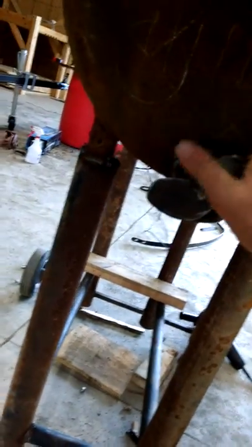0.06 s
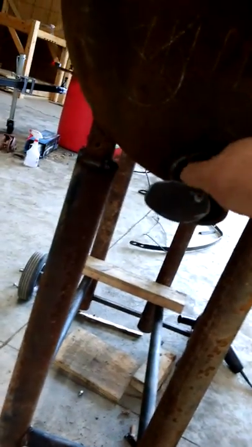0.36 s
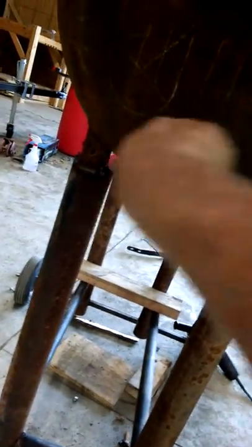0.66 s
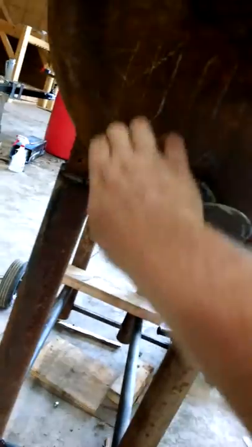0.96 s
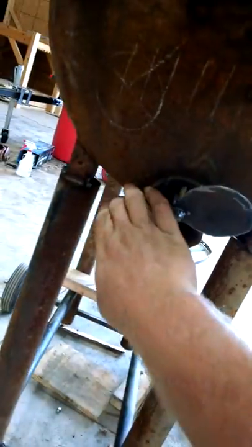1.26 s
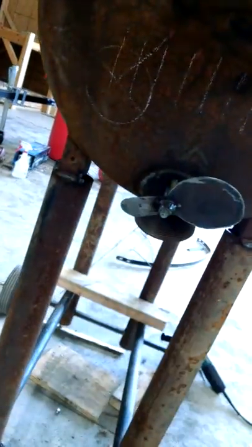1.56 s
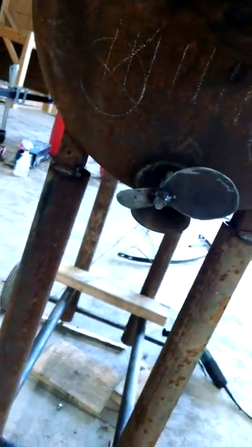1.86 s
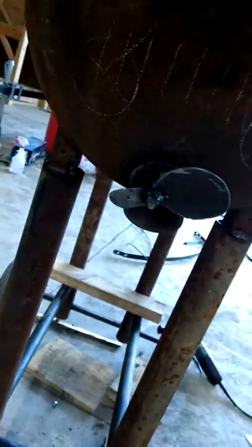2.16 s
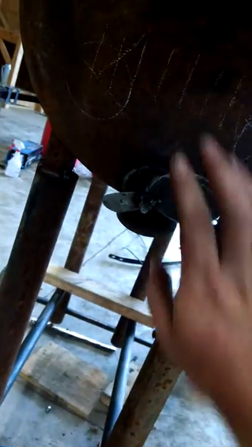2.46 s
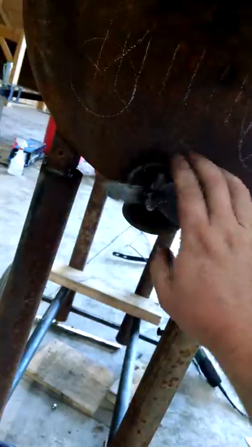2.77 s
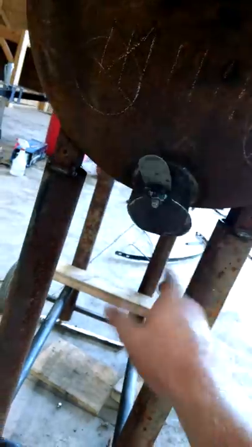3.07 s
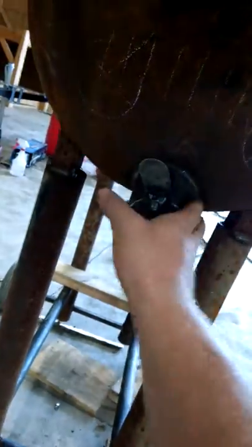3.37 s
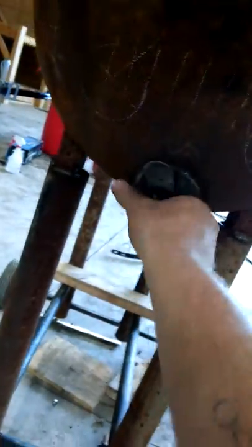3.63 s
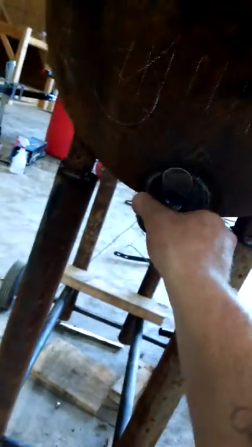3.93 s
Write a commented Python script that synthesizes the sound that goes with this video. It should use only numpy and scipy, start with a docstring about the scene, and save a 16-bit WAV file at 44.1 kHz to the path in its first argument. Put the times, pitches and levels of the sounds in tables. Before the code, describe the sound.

A steel vent flap on a big drum scrapes and rattles open, then shuts about two seconds later with one hard, briefly ringing clack. A blower hums and hisses steadily in the workshop, dipping at the clacks.

```python
"""Steel vent flap and workshop blower.

A hand works the round steel vent flap of a big drum while a blower hums and hisses steadily.
The flap scrapes and rattles open; about two seconds later one hard clack shuts it and leaves it ringing.
Automatic gain control ducks at the clacks, so the blower sinks and swells back slowly."""
import sys
import numpy as np
from scipy import signal
from scipy.fft import rfft, irfft
from scipy.io import wavfile

SR = 44100
rng = np.random.default_rng(int(sys.argv[2]) if len(sys.argv) > 2 else 0)


def store_pcm(level_fs):
    """Save levels as 16-bit WAV."""
    pcm = np.round(np.clip(level_fs, -1, 1) * 32767).astype(np.int16)
    wavfile.write(sys.argv[1], SR, np.atleast_2d(pcm).T)


N = 176400
T = np.arange(N) / SR
HZ = np.maximum(np.fft.rfftfreq(N, 1 / SR), 1)

# Coherence of the two microphone ports. Each row: frequency in Hz, left-right likeness from 0 to 1.
LIKENESS = [(60, 0.62), (250, 0.9), (550, 0.66), (900, .92), (1400, 0.98), (1700, .62), (2050, 0.52),
            (2520, 0.99), (2780, 0.97), (3280, 0.3), (3750, 0.93), (4080, 0.94), (4400, 0.38), (5000, 0.8),
            (5400, 0.72), (6000, 0.55), (14000, 0.53)]
FLAP_LIKENESS = 0.78


def flap_opens():
    """Each touch on the seat wakes a damped knock, clank and tick in the held plate; let go, it rings."""
    # Each row: start in seconds, length in seconds, knock in dB, clank in dB, tick in dB.
    touches = [ (0.552, 0.012, -38, -23.5, -22), (0.567, 0.022, -45, -20.5, -21),
               (0.588, 0.0034, -28, -18, -8), (0.591, 0.003, -12.5, -24, -26),
               (0.597, 0.002, -30, -15, -18), (0.6795, 0.0037, -24, -19.5, -28),
               (0.6868, 0.0052, -15, -16, -12.5), (0.695, 0.013, -26, -19, -19.5),
               (0.7125, 0.0034, -39, -15.5, -13), (0.7172, .002, -37, -23, -6)]
    # Held plate. Each row: frequency in Hz, relative density in dB.
    held_spectrum = [(100, -20), (240, -9), (450, -21), (1150, -14), (1500, 10), (1900, -12), (2900, -13),
                     (3600, -12), (4800, -19), (5500, -15), (6200, -12.5), (7300, -19), (8200, -4.5),
                     (8600, -23), (9100, -3), (9600, -16), (10300, -14.1), (11000, -5.5), (12000, -17),
                     (15500, -14)]
    # Free plate. Each row: frequency in Hz, relative level in dB, T60 in seconds.
    open_modes = [(232, -5, .15), (795, -13.5, .11), (1335, -16, .08), (1546, -1.5, .09), (2520, -11, .08),
                  (3676.5, -11, .4), (4430.5, 2, .31), (4753, -13, .12), (6200, -4, .04), (9155, 1.5, .045),
                  (12610, -6, .09)]
    # Knocks that ring it. Each row: start in seconds, gain in dB, contact cutoff in Hz.
    strikes = [(.591, -20, 1600), (0.686, -7, 1750), (0.7135, -28, 12000), (0.7195, -17, 14000)]
    knock_top_hz, clank_top_hz = 2240, 5600
    tail_db, tail_t60_s = -18, 0.26
    colour = from_db(over_hz(held_spectrum))
    grain = chatter(rough_db=1.5)
    bands = [(below(knock_top_hz), 0.045, 1),
             (above(knock_top_hz) * below(clank_top_hz), 0.045, grain),
             (above(clank_top_hz), 0.035, grain)]
    rattle = 0
    for k, (band, t60_s, roughness) in enumerate(bands):
        power = 0
        for start_s, length_s, *band_db in touches:
            contact = burst(start_s, length_s, t60_s)
            tail = from_db(tail_db) * burst(start_s, length_s, tail_t60_s)
            power += from_db(band_db[k]) ** 2 * (contact ** 2 + tail ** 2)
        rattle += np.sqrt(power) * noise(colour * band, FLAP_LIKENESS) * roughness
    ringing = sum(from_db(db) * ring(open_modes, start_s, top_hz) for start_s, db, top_hz in strikes)
    return rattle + ringing


def ring(modes, start_s, top_hz):
    """Struck modes die away; a soft contact hardly wakes those above top_hz."""
    tone = 0
    for hz, db, t60_s in modes:
        gain = from_db(db) / np.sqrt(1 + (hz / top_hz) ** 6)
        envelope = burst(start_s, 0, t60_s, rise_s=0.0011)
        tone += gain * envelope * np.sin(2 * np.pi * (hz * T + rng.random()))
    return at_ports(tone)


def flap_shuts():
    """A dull graze on the seat, a hard chatter, then the drum's dense ring and the flap's unsteady modes."""
    # Clack. Each row: frequency in Hz, relative density in dB.
    clack_spectrum = [(100, -24), (300, -34), (900, -36), (1650, -3), (2100, -9), (2350, -4), (2540, 0),
                      (2740, -20), (2950, -3), (3250, -3.5), (3850, -2), (4700, -3.5), (6700, -10),
                      (8200, -5), (8600, -12), (9050, -2), (9800, -16), (10700, -8), (11250, 4.5),
                      (12200, -14), (13100, -5), (13600, -23), (13950, -11), (14650, -18), (15500, -8)]
    # Shut plate. Each row: frequency in Hz, relative level in dB, T60 in seconds.
    shut_modes = [(1362, -23.5, .35), (2590, -15, .16), (2961, -15, .16), (3397, -29, .35),
                  (3636, -23, .24), (3764, -21, .33), (3794, -24, .28), (3973, -25, .28), (4006, -25, .3),
                  (4056, -26, .28), (4315, -26, .33), (4694, -25, .33), (5044, -28, .3), (5469, -27, .22),
                  (5696, -25, .25), (6309, -32, .3), (8200, -11, .05), (9050, -10, .05), (11050, -9, .07),
                  (11380, -6.5, .065), (13010, -8.5, .075)]
    shut_s, graze_s, hold_s, rise_s = 2.9705, 0.002, 0.0099, 0.008
    graze_db, clack_db, drum_db, modes_db = -19, -2.5, -14, -0.5
    contact_t60_s, drum_t60_s = 0.065, 0.35
    colour = from_db(over_hz(clack_spectrum))
    likeness = over_hz(LIKENESS)
    graze = from_db(graze_db) * burst(shut_s - graze_s, graze_s, contact_t60_s)
    graze = graze * noise(colour * below(hz=2900), FLAP_LIKENESS)
    clack = from_db(clack_db) * burst(shut_s, hold_s, contact_t60_s, rise_s)
    clack = clack * chatter(rough_db=3.0) * noise(colour, likeness)
    drum = from_db(drum_db) * burst(shut_s, 0, drum_t60_s, rise_s)
    drum = drum * noise(colour * below(hz=6200), likeness)
    modes = 0
    for hz, db, t60_s in shut_modes:
        modes += from_db(db) * burst(shut_s, 0, t60_s, rise_s) * wavering(hz, depth=0.22, rate_hz=20)
    return graze + clack + drum + from_db(modes_db) * at_ports(modes)


def chatter(rough_db):
    """Gain of the tiny uneven contacts within a clack."""
    return rms_one(from_db(rough_db * drift(rate_hz=390)))


def pivot_rub():
    """The pivot rubs faintly in one narrow resonance as the flap swings aside."""
    centre_hz, half_width_hz, level_db = 1846, 66, -30.5
    resonance = 1 / (1 + ((HZ - centre_hz) / half_width_hz) ** 2)
    envelope = burst(start_s=1.285, hold_s=0.022, t60_s=0.14, rise_s=0.01)
    return from_db(level_db) * envelope * noise(resonance, FLAP_LIKENESS)


def blower_air():
    """Moving air: a low roar, a midrange rush and a treble hiss, each swelling and fluttering."""
    # Each row: frequency in Hz, relative density in dB.
    air_spectrum = [(20, -14.2), (42, -7.4), (90, -7), (120, -1.5), (160, -7.8), (225, -0.8), (290, -0.9),
                    (400, -6.3), (600, -10.5), (830, -15), (1000, -13.7), (1450, -15.7), (2000, -17.8),
                    (2320, -21), (2550, -14.3), (2780, -19.3), (3000, -16.3), (3200, -20.7), (4150, -23.8),
                    (4600, -21.6), (5300, -24.8), (7000, -22.6), (9500, -19.7), (12500, -22.2),
                    (15500, -29.5)]
    # Band swells. Each row: time in seconds, gain in dB.
    roar_swell = [(0, 0.5), (.35, 1.5), (.9, -2), (1.12, -1.5), (1.25, 0), (1.65, 0), (2.3, -1), (2.95, 1),
                  (3.1, -1.5), (4, -1.5)]
    rush_swell = [(0, 0), (.5, 0.5), (.9, -1), (1.5, 0), (2.9, 0), (3.35, -1.5), (3.65, -.5), (4, -1)]
    hiss_swell = [(0, -3.5), (.5, 0), (1.0, -2.5), (1.5, -1), (1.66, 0.5), (1.88, -1.5), (2.3, -0.5),
                  (2.55, 1.5), (2.77, -1), (2.95, -0.5), (3.26, -0.5), (3.37, -4.5), (3.58, -0.5),
                  (3.76, -4), (3.88, -1), (4, -5)]
    roar_top_hz, rush_top_hz, level_db = 406, 4300, -22.5
    air = rfft(noise(from_db(over_hz(air_spectrum)), over_hz(LIKENESS)))

    def layer(band, swell, flutter_db, rate_hz):
        return irfft(air * band ** 2, N) * from_db(over_time(swell) + flutter_db * drift(rate_hz))

    roar = layer(below(roar_top_hz), roar_swell, flutter_db=1.0, rate_hz=28)
    rush = layer(above(roar_top_hz) * below(rush_top_hz), rush_swell, flutter_db=0.65, rate_hz=20)
    hiss = layer(above(rush_top_hz), hiss_swell, flutter_db=1.28, rate_hz=23)
    return from_db(level_db) * (roar + rush + hiss)


def motor_hum():
    """The blower motor's wavering tones swell, then fade."""
    # Each row: frequency in Hz, base level in dB.
    tones = [(42, -52), (64, -49), (120, -39), (239.7, -42), (270.5, -38), (629, -50)]
    # Each row: time in seconds, gain in dB.
    swell = [(0, -4), (1.5, 4), (2.0, 2), (2.9, -2), (3.3, -6), (4, -10)]
    hum = sum(from_db(db) * wavering(hz, depth=0.2, rate_hz=3.5) for hz, db in tones)
    return at_ports(hum * from_db(over_time(swell)))


def vent_hoots():
    """Faint airy tones, each sagging and lower than the last, as the hand closes in on the vent."""
    # Each row: start in seconds, length in seconds, starting pitch in Hz, level in dB.
    hoots = [(3.3, .16, 575, -39), (3.52, .08, 540, -39), (3.59, .11, 485, -35)]
    sag_hz_per_s = 185
    tones = 0
    for start_s, length_s, hz, db in hoots:
        age_s = np.clip(T - start_s, 0, length_s)
        envelope = from_db(db) * np.sin(np.pi * age_s / length_s)
        tones += envelope * wavering(hz - sag_hz_per_s * age_s, depth=0.83, rate_hz=21)
    return at_ports(tones)


def ports():
    """Complex gain of the left and right microphone ports at every frequency."""
    # Each row: frequency in Hz, left phase lead in radians.
    lead = [(40, 2.23), (260, 1.25), (550, 0.49), (1500, -0.14), (2000, -2.04), (2450, -3.05),
            (2820, -3.22), (3250, -4.68), (3700, -6.18), (4100, -6.39), (4600, -8.29), (5000, -9.44),
            (5450, -9.55), (6200, -11.91), (10900, -21.98), (15000, -30.91)]
    # Each row: frequency in Hz, left minus right in dB.
    balance = [(50, -6), (200, -6), (600, -2.5), (1300, -0.5), (3000, -1.7), (5000, -1.5), (7000, -7.5),
               (10000, -12.5), (14000, -13.5)]
    lead_rad = np.interp(HZ, *np.transpose(lead))
    left = from_db(over_hz(balance)) * np.exp(1j * lead_rad)
    return np.array([left, np.ones(len(HZ))]) / np.sqrt((1 + abs(left) ** 2) / 2)


def at_ports(x):
    """A mono sound as the two ports pick it up."""
    return irfft(rfft(x) * ports(), N)


def noise(colour, likeness):
    """Coloured, partly coherent noise at the two ports; rms 1."""
    mid, side = rfft(rng.standard_normal((2, N)))
    alike = np.clip(likeness, 0, 0.99)
    pair = np.sqrt(1 + alike) * mid + np.sqrt(1 - alike) * side * np.array([[1], [-1]])
    return rms_one(irfft(pair * colour * ports(), N))


def burst(start_s, hold_s, t60_s, rise_s=0.00045):
    """Envelope: linear rise, hold, exponential decay."""
    age_s = T - start_s
    return np.clip(age_s / rise_s, 0, 1) * from_db(-60 * np.clip((age_s - hold_s) / t60_s, 0, 4))


def wavering(hz, depth, rate_hz):
    """A tone whose level and phase wander."""
    wander = 1 + depth * (drift(rate_hz) + 1j * drift(rate_hz))
    cycles = np.cumsum(hz * np.ones(N)) / SR
    return np.sqrt(2) * np.real(wander * np.exp(2j * np.pi * cycles))


def drift(rate_hz):
    """Random wander, mostly below rate_hz; rms 1."""
    return rms_one(irfft(rfft(rng.standard_normal(N)) / (1 + (HZ / rate_hz) ** 2), N))


def over_hz(points):
    """Rows of (Hz, value) interpolated over log frequency."""
    hz, value = np.transpose(points)
    return np.interp(np.log(HZ), np.log(np.maximum(hz, 1)), value)


def over_time(points):
    """Rows of (seconds, value) interpolated to every sample."""
    return np.interp(T, *np.transpose(points))


def below(hz):
    """Steep low-pass gain."""
    return 1 / np.sqrt(1 + (HZ / hz) ** 12)


def above(hz):
    """High-pass gain, the power complement of below(hz)."""
    return np.sqrt(1 - below(hz) ** 2)


def from_db(db):
    """Decibels to gain."""
    return 10 ** (np.asarray(db) / 20)


def rms_one(x):
    """Scale to rms 1."""
    return x / np.sqrt(np.mean(x ** 2) + 1e-20)


def smooth(x, tau_s):
    """One-pole average."""
    pole = np.exp(-1 / (tau_s * SR))
    return signal.lfilter([1 - pole], [1, -pole], x)


def scene():
    """Blower and flap together, in stereo."""
    return blower_air() + motor_hum() + flap_opens() + pivot_rub() + flap_shuts() + vent_hoots()


def record(dry):
    """Gain control starts ducked, attacks fast and recovers slowly; then soft clipping and band limits."""
    threshold_db, start_duck_db, recover_db_per_s = -15, 14, 8
    sense_s, attack_s, look_ahead_s = 0.0075, 0.00085, 0.003
    low_cut_hz, high_cut_hz = 34, 15600
    power = smooth(np.mean(dry ** 2, axis=0), sense_s)
    over_db = 10 * np.log10(power + 1e-12) - threshold_db
    # Peak hold that releases at a constant dB rate.
    recovery_db = recover_db_per_s * T
    held_db = np.maximum.accumulate(np.maximum(over_db + recovery_db, start_duck_db))
    duck_db = np.maximum(held_db - recovery_db, 0)
    duck_db = np.interp(T + look_ahead_s, T, duck_db)
    duck_db = start_duck_db + smooth(duck_db - start_duck_db, attack_s)
    rounded = np.tanh(dry * from_db(-duck_db))
    passband = above(low_cut_hz) / np.sqrt(1 + (HZ / high_cut_hz) ** 400)
    return irfft(rfft(rounded) * passband, N)


dry = scene()
out = record(dry)
store_pcm(out)
```